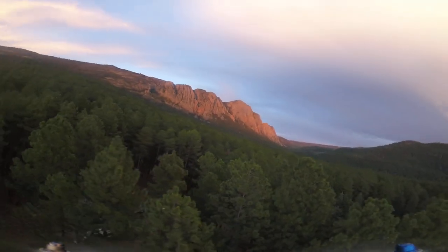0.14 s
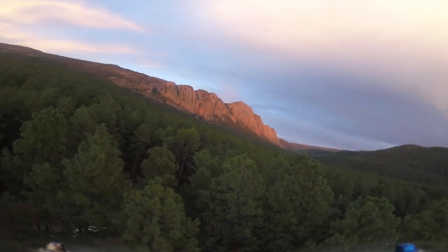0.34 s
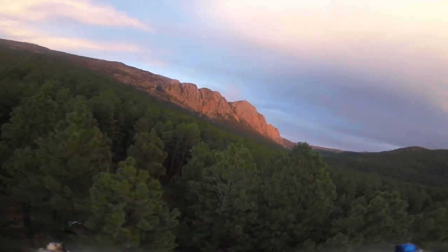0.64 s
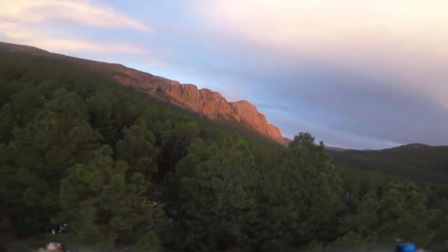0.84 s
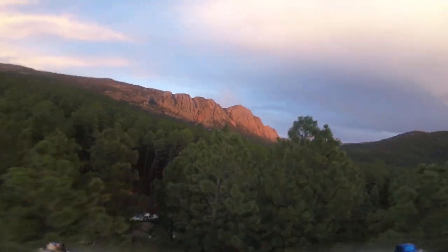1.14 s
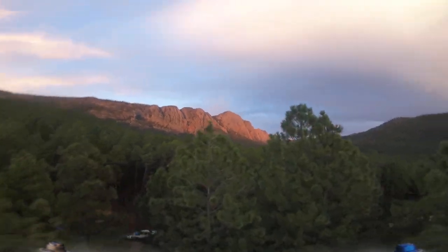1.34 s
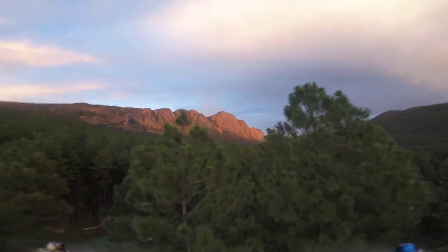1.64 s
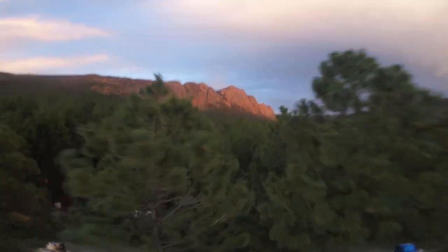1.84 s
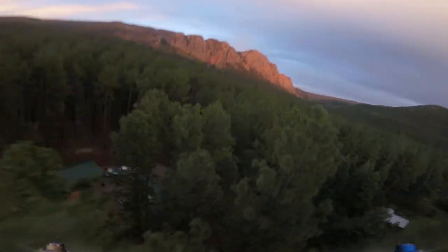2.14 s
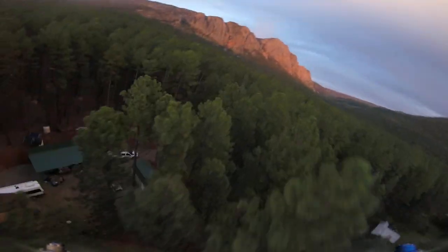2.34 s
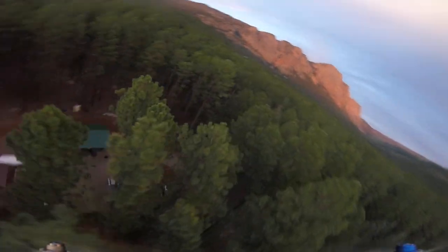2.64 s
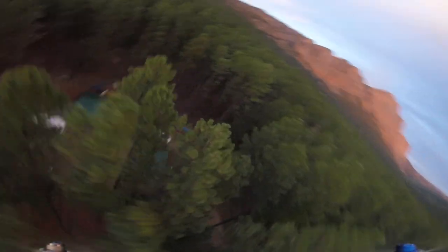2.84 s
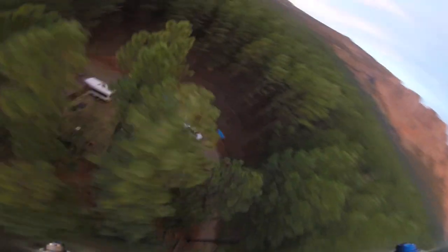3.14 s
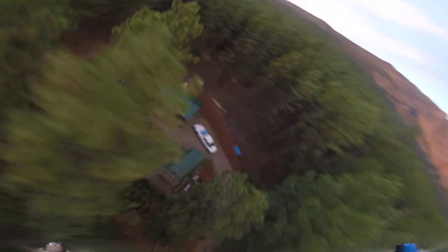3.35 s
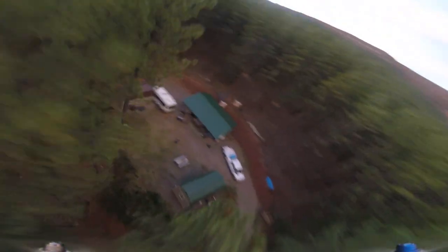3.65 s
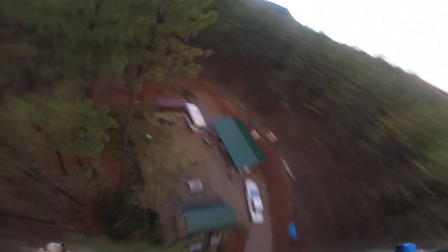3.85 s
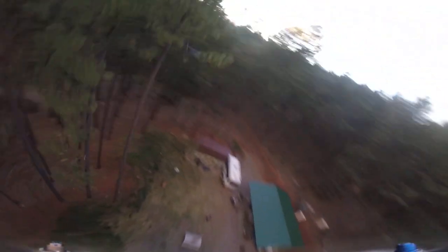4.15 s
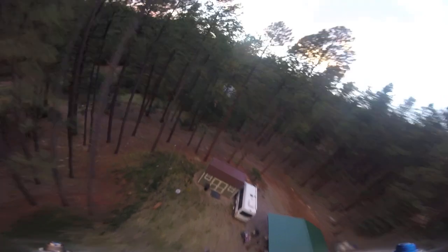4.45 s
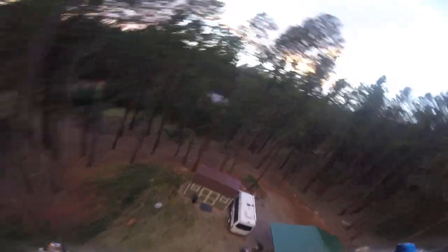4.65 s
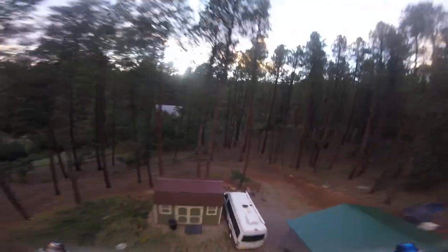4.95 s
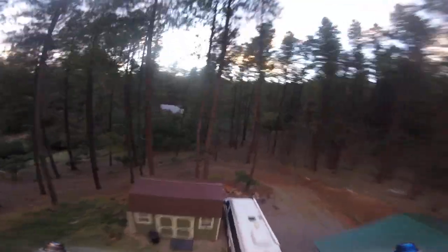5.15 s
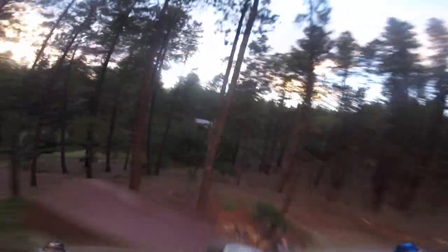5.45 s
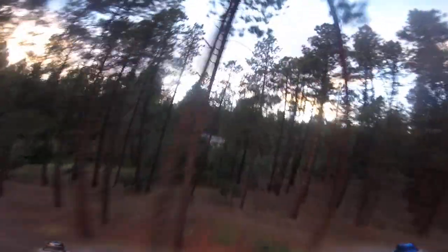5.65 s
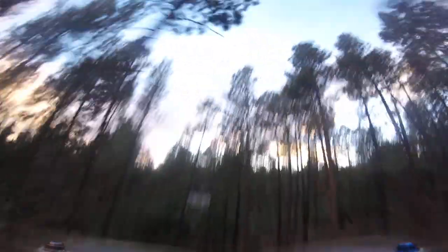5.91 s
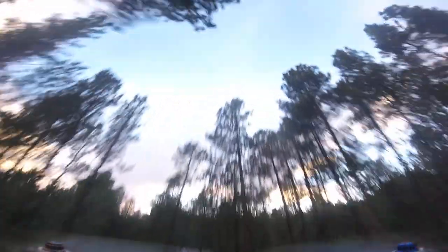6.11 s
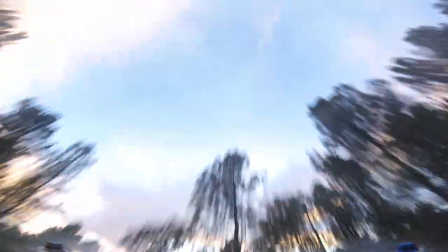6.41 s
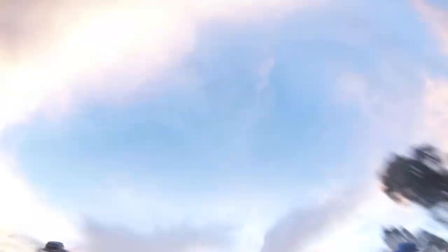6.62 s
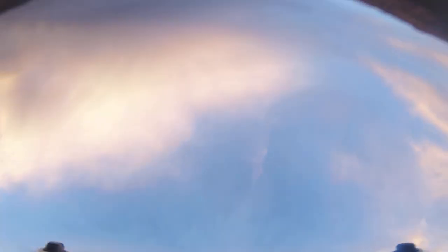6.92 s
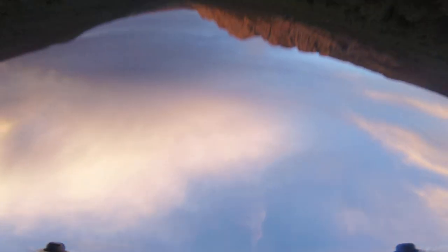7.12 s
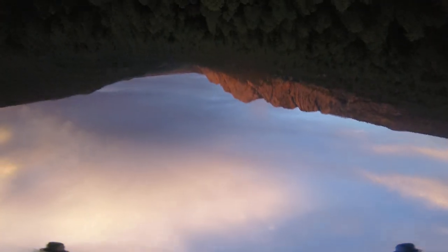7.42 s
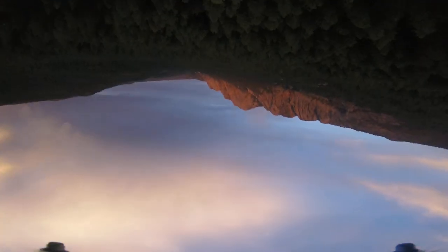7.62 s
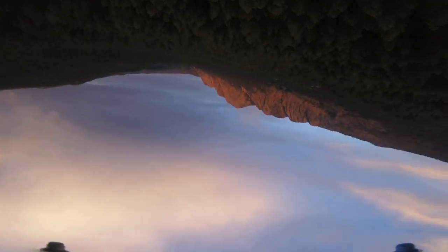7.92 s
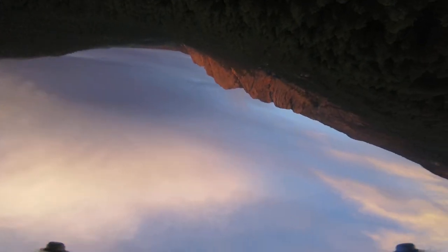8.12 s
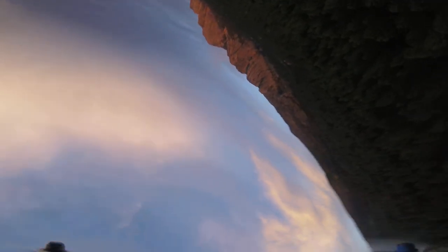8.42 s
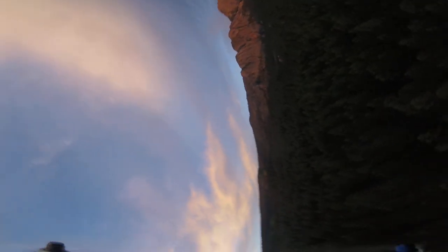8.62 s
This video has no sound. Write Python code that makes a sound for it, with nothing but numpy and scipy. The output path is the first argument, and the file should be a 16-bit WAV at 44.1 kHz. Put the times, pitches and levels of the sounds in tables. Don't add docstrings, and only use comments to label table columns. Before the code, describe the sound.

A small four-rotor drone heard from a microphone on its frame, close, loud and slightly overloaded, with dulled treble and no room echo. From 0 to 1.9 s a mid-low buzzing whine beats unevenly over roaring wash, stepping upward, with light plastic ticks. Around 2 s it leaps to a brief high burst, then collapses; until 3 s mainly airflow, low buffeting, a thin whistle and faint gliding coil chirps remain. At 3.1 s the motors surge back with heavy wind and a high rattling buzz, peak near 3.7 and dip. A turn swells at 4.3, with a sharp tick, and sags by 5.1. Lift rises at 5.3, growing into a piercing, pulsing climb from 6 to 6.9 s. It plunges by 7.2 to a faint low idle hum amid hissing, buffeting air. At 8.3 s the rotors catch, growling upward, with a wind slap around 8.7.

```python
import sys
import numpy as np
from scipy import signal
from scipy.fft import rfft, irfft, next_fast_len
from scipy.io import wavfile
from scipy.ndimage import uniform_filter1d, map_coordinates

SR = 44100
rng = np.random.default_rng(int(sys.argv[2]) if len(sys.argv) > 2 else 0)


def wrap_up_sound(samples):
    columns = np.atleast_2d(samples).T
    tamed = np.clip(columns, -1, 1)
    steps = np.round(tamed * 32767).astype(np.int16)
    wavfile.write(sys.argv[1], SR, steps)


def voltage_ratio(decibels):
    exponent = np.asarray(decibels, float) / 20
    return 10 ** exponent


N = 386757


def unit(x):
    return x / np.sqrt(np.mean(x ** 2) + 1e-20)


def curves(rows):
    s, *columns = np.transpose(rows)
    t = np.arange(N) / SR
    return np.array([np.interp(t, s, column) for column in columns])


def bumps(rows):
    t = np.arange(N) / SR
    return sum(db * np.exp(-((t - s) / half_s) ** 2) for s, half_s, db in rows)


def wobble(rate_hz):
    knots = rng.standard_normal(int(N * rate_hz / SR) + 4)
    return map_coordinates(knots, [np.arange(N) * rate_hz / SR])


def coloured(x, spectrum):
    size = next_fast_len(N + 8192)
    hz, db = np.transpose(spectrum)
    log_hz = np.log(np.fft.rfftfreq(size, 1 / SR) + 1)
    gain = voltage_ratio(np.interp(log_hz, np.log(hz), db, left=-120, right=-120))
    return irfft(rfft(x, size) * gain, size)[:N]


def rush(spectrum, patchy_db, chop=1):
    z = signal.stft(rng.standard_normal(N + 512), nperseg=512)[2]
    field = uniform_filter1d(rng.standard_normal(z.shape), size=6, axis=0)
    field = uniform_filter1d(field, size=10, axis=1)
    noise = signal.istft(z * voltage_ratio(patchy_db * unit(field)), nperseg=512)[1][:N]
    return unit(coloured(noise * chop, spectrum))


# (time [s], blade rate of the loud pair [Hz], its tone level [dB], wash level [dB])
CRUISE = [(0, 253.6, -17.5, -27), (.7, 251, -16.5, -27), (1.3, 294.2, -17, -26.5), (1.6, 290.7, -16, -26),
          (1.91, 338.4, -17.5, -23.5)]
BLIP = [(2.01, 514.3, -14, -29.5), (2.075, 552, -17.5, -27.5), (2.2, 285.5, -26, -30.5),
        (2.29, 166.3, -44, -46.5), (2.659, 144.6, -47, -39.5)]
DIVE = [(3.02, 132.2, -43, -37.5), (3.11, 154.8, -32.5, -27), (3.21, 212, -16, -26.5),
        (3.3, 261.3, -18, -25), (3.47, 327.5, -16, -27), (3.75, 354.7, -16, -33),
        (3.86, 229.9, -22.5, -37.5), (3.94, 196.3, -22.5, -35)]
TURN = [(4.28, 315, -17.5, -25), (4.43, 312.4, -18, -26.5), (4.64, 289.7, -16, -28.5),
        (4.87, 262.9, -19, -26.5), (4.98, 234, -23, -28.5), (5.09, 224.3, -25.5, -31.5)]
LIFT = [(5.19, 251.9, -19.5, -28.5), (5.3, 327, -15.5, -26.5), (5.469, 360, -16, -29.5),
        (5.6, 332, -17, -29.5)]
CLIMB = [(5.73, 397, -17.5, -26), (5.94, 476, -15.5, -30), (6.04, 556, -17, -29), (6.32, 563, -15.5, -29),
         (6.39, 591, -16, -29), (6.85, 588, -16, -29), (6.95, 455, -14.5, -27.5), (7.06, 318, -21, -31),
         (7.14, 215, -29, -37.5)]
COAST = [(7.21, 122, -50, -45), (7.29, 88, -33, -43), (7.45, 86, -32, -39), (7.55, 98, -31, -36),
         (7.71, 116, -30, -39), (7.78, 121, -47, -38), (8.28, 150, -43, -34)]
CATCH = [(8.305, 160, -30, -33), (8.33, 186, -19, -32), (8.375, 225, -20, -28), (8.41, 262, -23, -24),
         (8.47, 289, -19, -23), (8.6, 306, -21, -25), (8.77, 344, -21, -27)]


def throttle():
    hz, tone_db, wash_db = curves(CRUISE + BLIP + DIVE + TURN + LIFT + CLIMB + COAST + CATCH)
    hover_hz, loaded_hz = 260, 215
    return hz, tone_db, wash_db, np.log2(np.maximum(hz, loaded_hz) / hover_hz)


def lee():
    return bumps([(3.595, 0.46, -8.5)])


# (time [s], second rotor over the pair [%], third rotor
STEERING = [(0, -16, 9), (.6, -8, 2), (.8, -7, -6), (.9, 5, -4), (1.55, 7, -4), (1.8, 5.5, 16),
            (1.96, 4, 11), (2.03, -7, 1.5), (2.25, -13, 10), (3.25, -6, 18), (3.5, -5, 9), (3.76, -9.5, 4),
            (3.92, -5, 6), (4.12, -11, 16), (4.33, -6, 16), (4.5, -9, 9), (5.05, -5.5, 12), (5.18, 5, 19),
            (5.38, 4, 10), (5.49, -8, 7), (5.62, -13, 7), (5.86, -12, 12), (6.03, -8, -2),
                  (6.85, -9, -4), (6.94, 7, -6), (7.4, 9, -8), (8.4, -6, -11), (8.55, -11, -17),
                  (8.7, -5, -15)]


def blade_phases():
    pair_hz = throttle()[0]
    second, third = 1 + curves(STEERING) / 100
    hz = []
    for rate_hz in [pair_hz, pair_hz * second, pair_hz * third]:
        hunting = 1 + 0.004015 * wobble(25) + 0.00399 * wobble(9)
        hz.append(uniform_filter1d(rate_hz, size=1400) * hunting)
    return 2 * np.pi * np.cumsum(hz, axis=1) / SR


# (time [s], start [Hz], end [Hz], level [dB])
COIL_CHIRPS = [
    (2.19, 3900, 3000, -52),
    (2.255, 4100, 3000, -56),
    (2.44, 4100, 3100, -56),
    (2.45, 5900, 4900, -60),
    (2.56, 3400, 4000, -59),
    (2.67, 5700, 4700, -56),
    (2.9, 3900, 3400, -55),
]
# (time [s], half length [s], level [dB])
WHISTLE_SWELL = [
    (2.3, 1.4, 6),
]


def coils():
    whistle = rush([(5880, -25), (5980, 0), (6040, 0), (6100, -25)], patchy_db=3)
    out = voltage_ratio(-75 + bumps(WHISTLE_SWELL) + 2.5 * wobble(5)) * whistle
    u = np.linspace(0, 1, 2600)
    for s, start_hz, end_hz, db in COIL_CHIRPS:
        glide = np.sin(2 * np.pi * np.cumsum(start_hz + (end_hz - start_hz) * u) / SR)
        out[round(s * SR):][:len(u)] += voltage_ratio(db) * np.sin(np.pi * u) * glide
    return out


# (time [s], level [dB])
MOUNT_BUZZ = [(3.05, -89.5), (3.3, -39), (3.55, -40.5), (3.77, -44), (3.9, -61), (4.15, -51), (4.4, -61),
              (4.8, -84.5)]
# (time [s], strength [dB, halved when struck])
BRIGHT_TICKS = [(0.387, -52), (0.5726, -37), (0.6394, -56), (0.8035, -50), (0.923, -44), (1.0899, -34.5),
                (1.3745, -47), (3.1857, -51), (3.2615, -44), (4.396, -54.5), (4.4408, -33), (4.7657, -42.5),
                (5.7857, -51), (5.919, -46), (6.577, -37.5)]


def rattle():
    ringing = rush([(6150, -30), (6400, 0), (6750, -3), (7100, -7), (9500, -6), (11000, -14)], patchy_db=1)
    blows = np.zeros(N)
    for s, db in BRIGHT_TICKS:
        blows[round(s * SR)] = voltage_ratio(db / 2 + 1.0)
    ticks = coloured(blows, [(4000, -32.0), (6500, -4), (9000, 0.0), (12500, 8)])
    return voltage_ratio(curves(MOUNT_BUZZ)[0]) * ringing + ticks


# (time [s], buffet level [dB])
AIRSPEED = [(0, -31.5), (.15, -42), (1.45, -33.5), (1.93, -43), (2.3, -34.5), (2.66, -35), (3.1, -24),
            (3.4, -33.5), (3.9, -40.5), (4.35, -29), (4.86, -32.5), (5.08, -38), (5.28, -30.5),
            (6.3, -36.5), (6.98, -33), (7.21, -34.5), (7.9, -30), (8.5, -33.5)]
# (frequency [Hz], level [dB per Hz])
BUFFET_SPECTRUM = [(12, -40), (20, 0.5), (118, -5.5), (248, -8.5), (400, -10.5), (600, -17.5), (900, -25),
                   (1300, -44), (1800, -120)]
WASH_SPECTRUM = [(90, -49), (150, -15), (300, 1), (600, -1), (1000, -0.5), (1250, -5.5), (1500, -24.5)]
HOUSING_SPECTRUM = [(1100, -40.5), (1350, -4), (1600, 1), (2200, 1), (2600, 0.5), (2950, -10.5),
                    (3300, -21.5), (3800, -29.5)]
HISS_SPECTRUM = [(2600, -24), (3000, -0.5), (3400, 2), (4200, -3), (4900, -0.5), (5900, -4), (6200, -7),
                 (7000, -9), (8000, -12), (10000, -11.5), (12500, -14)]
# (time [s], half length [s], level [dB])
HISS_SWELLS = [
    (3.55, .35, 4),
    (2.2, 0.3, -4),
    (7.33, 0.47, 4),
    (5.6, .3, 3.5),
]


def air(phases):
    _, _, wash_db, octaves = throttle()
    snap_db = bumps([(8.71, .07, 9.5)])
    buffet_db = curves(AIRSPEED)[0] + snap_db
    chop = 1 + .18 * np.sin(phases[0]) + 0.097 * np.sin(phases[1])
    gust_db = 0.93 * wobble(40) + 0.43 * wobble(14)
    buffet = voltage_ratio(buffet_db + 6 + 1.2 * wobble(6)) * rush(BUFFET_SPECTRUM, patchy_db=.6)
    open_db = wash_db + 1.5 - 2 * octaves + gust_db + 1.2 * wobble(5)
    wash = voltage_ratio(open_db) * rush(WASH_SPECTRUM, patchy_db=2.0)
    housing = voltage_ratio(wash_db + lee() + 2.5 + gust_db) * rush(HOUSING_SPECTRUM, patchy_db=0.92, chop=chop)
    hiss_gain = np.hypot(voltage_ratio(wash_db - 17 + 8 * octaves), voltage_ratio(-54.5))
    hiss_gain = hiss_gain * voltage_ratio(0.9 * gust_db + bumps(HISS_SWELLS))
    hiss = hiss_gain * rush(HISS_SPECTRUM, patchy_db=1.2, chop=chop)
    return buffet + wash + housing + hiss


# (multiple of blade rate, level re third [dB])
HIGH_ORDERS = [(4, -10), (5, -15), (6, -23), (7, -17), (7.5, -21), (8, -16), (8.5, -21), (9, -16),
               (10, -24)]
# (time [s], half length [s], level [dB])
SHAFT_SHUDDERS = [
    (3.55, .3, 6),
    (8.72, .035, 20),
    (.02, .15, 5),
]
ODD_SHUDDERS = [
    (.9, 0.5, 5),
    (4.5, .4, -5.5),
    (5.15, .1, 8),
    (5.4, .12, -5),
    (8.5, .3, 8.5),
]
SECOND_SHUDDERS = [
    (4.97, 0.17, 10),
    (3.55, .35, 0),
    (5.17, .07, 5.5),
    (1.0, 0.25, 2.5),
]
HIGH_SHUDDERS = [
    (2.03, .12, -6),
    (6.6, .35, 2),
    (5.8, .15, -4),
]


def overtone_levels(octaves):
    third_db = -16 + 3 * octaves + .4 * lee()
    orders = [(1 / 2, -21.5 + 8 * octaves + bumps(SHAFT_SHUDDERS)),
              (3 / 2, -15 - 6.5 * octaves + bumps(ODD_SHUDDERS)),
              (2, -10.5 + bumps(SECOND_SHUDDERS)),
              (3, third_db)]
    high_db = third_db + bumps(HIGH_SHUDDERS)
    return orders + [(order, high_db + db) for order, db in HIGH_ORDERS]


# (time [s], second under the pair [dB], third under the pair [dB])
PULL = [(.7, -15, -19), (.9, -7, -13.5), (1.15, -8, -19.5), (1.4, -9.5, -7.5), (1.7, -9.5, -22.5),
        (2.1, -7, -10), (3.25, -11.5, -1.5), (3.45, -6.5, -12), (3.749, -3.5, -8), (4.05, -18.5, -7),
        (4.45, -6.5, -8.5), (4.8, -10, -4), (5.1, -7, -23.5), (5.5, -8.5, -8.5), (6.1, -4.5, -17),
        (6.8, -9.5, -25.5), (7.5, -14, -20), (8.4, -2.5, -12)]
# (time [s], strength of the twin [0-1])
NULLS = [(.03, .6), (.47, .7), (.765, .7), (.88, .7), (1.03, .4), (1.2, .5), (1.42, .4), (1.62, .5),
         (1.84, .35), (1.96, .3), (2.25, .1), (3.12, .1), (3.88, .15), (4.3, .15), (4.84, .35), (5.06, .4),
         (5.25, .5), (5.61, .4), (5.89, .6), (6.2, .5), (6.345, .7), (6.48, .9), (6.69, .75), (6.89, .5),
         (7.0, .3), (7.2, .05), (8.28, .05), (8.4, .3), (8.62, .2), (8.9, .2)]
# (frequency [Hz], gain [dB])
BODY = [(20, -0.5), (760, 0), (980, 3.5), (1250, 1), (1750, 1.5), (3000, 0), (15000, -3.5)]


def whine(phases):
    _, tone_db, wash_db, octaves = throttle()
    orders = overtone_levels(octaves)
    null_s = [s for s, _ in NULLS]
    slip = 2 * np.pi * np.interp(np.arange(N) / SR, null_s, np.arange(len(NULLS)))
    strength = np.clip(curves(NULLS)[0], 0, 1)
    lean_db = 0.51 * np.clip(wash_db + 10.5 - tone_db, -9, 6)
    levels_db = [tone_db, *(tone_db + curves(PULL))]
    mates = [strength, .55 * strength, 0]
    blades, overtones = np.zeros(N), np.zeros(N)
    for phase, db, mate in zip(phases, levels_db, mates):
        beating = (np.sin(phase) - mate * np.sin(phase - slip)) / (1 + mate)
        blades += voltage_ratio(db + 1.5 + 1.2 * wobble(30)) * beating
        twin = phase - 2 * np.pi * np.cumsum(6.5 + 3.5 * wobble(5)) / SR
        effort = voltage_ratio(db + lean_db - 2.5)
        for order, order_db in orders:
            pair = np.sin(order * phase) + 0.58 * np.sin(order * twin)
            overtones += effort * voltage_ratio(order_db + .2 + 1.5 * wobble(25)) * pair
    flexing = .8 * coloured(blades ** 2, [(200, -30), (350, 0), (5000, 0)])
    return np.sqrt(2) * (blades + coloured(overtones, BODY)) + flexing


def scene():
    phases = blade_phases()
    return (coils() + rattle() + air(phases) + whine(phases))[None]


def roll_off(x):
    return signal.sosfilt(signal.butter(12, 12020, fs=SR, output="sos"), x)


# (frequency [Hz], gain [dB])
MICROPHONE = [(15, -25.5), (45, -1), (5000, 0.5), (8000, -5), (12000, -24.5), (14000, -62)]


def record(dry):
    rounded = dry / (1 + np.abs(dry / .63) ** 6) ** (1 / 6)
    mix = coloured(rounded[0], MICROPHONE)[None]
    return roll_off(mix)


dry = scene()
out = record(dry)
wrap_up_sound(out)
```